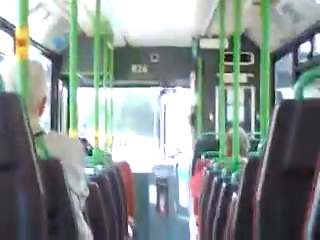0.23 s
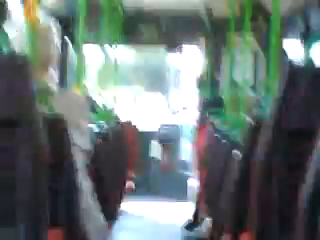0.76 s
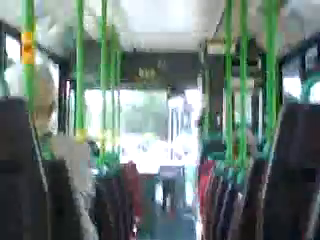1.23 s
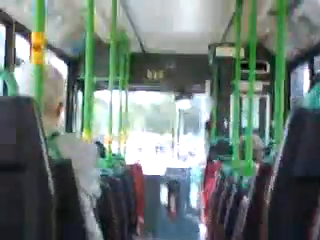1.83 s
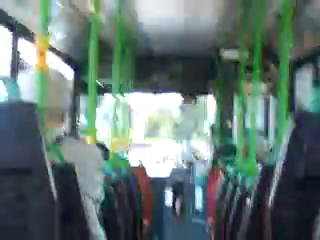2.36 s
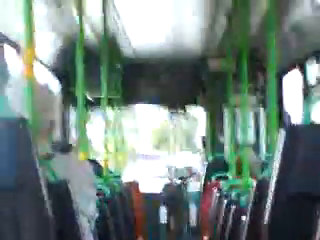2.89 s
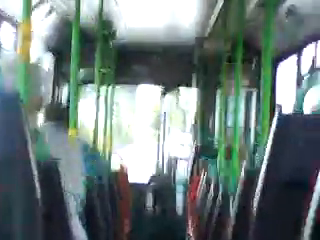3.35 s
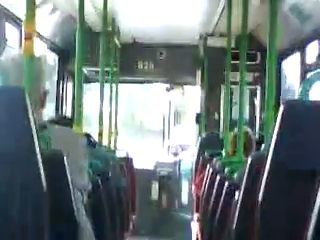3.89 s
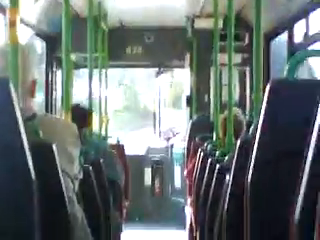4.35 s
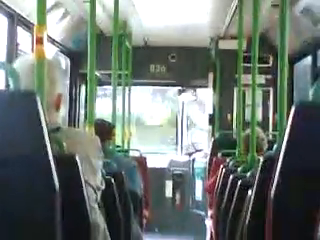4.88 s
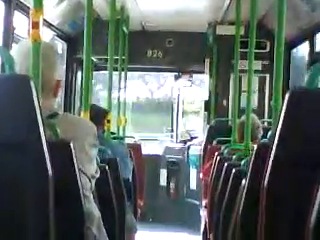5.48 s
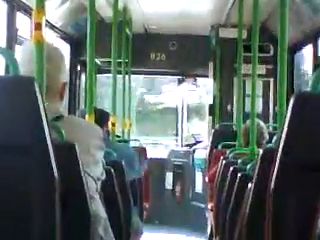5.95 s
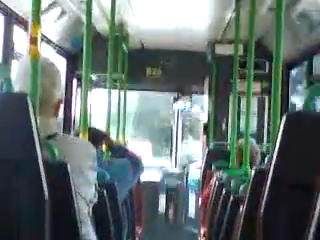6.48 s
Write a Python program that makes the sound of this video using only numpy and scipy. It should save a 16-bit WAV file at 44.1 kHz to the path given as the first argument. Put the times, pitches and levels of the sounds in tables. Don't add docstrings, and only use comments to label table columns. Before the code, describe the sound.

Inside a slowing diesel bus, a low engine drone slides gradually down in pitch over road rumble, floor thuds, trim rattles and tiny squeaks.

```python
import sys
import numpy as np
from scipy import signal
from scipy.io import wavfile
from scipy.ndimage import uniform_filter1d

SR = 44100
rng = np.random.default_rng(int(sys.argv[2]) if len(sys.argv) > 2 else 0)


def store_pcm(level_fs):
    pcm = np.round(np.clip(level_fs, -1, 1) * 32767).astype(np.int16)
    wavfile.write(sys.argv[1], SR, np.atleast_2d(pcm).T)


def rack_gain(trim_db):
    fader = np.asarray(trim_db, float)
    return 10 ** (fader / 20)


N = 296352


def rms_one(x):
    return x / np.sqrt(np.mean(x ** 2) + 1e-20)


def in_time(rows):
    t_s, value = np.transpose(rows)
    return np.interp(np.arange(N) / SR, t_s, value)


def drift(rate_hz):
    r = np.exp(-80 * np.pi * rate_hz / SR)
    slow = signal.lfilter([1], [1, -2 * r, r * r], rng.standard_normal(N // 40 + 2002))[2000:]
    return np.interp(np.arange(N) / 40, np.arange(len(slow)), rms_one(slow))


def resonance(x, hz, width_hz):
    r = np.exp(-np.pi * width_hz / SR)
    poles = [1, -2 * r * np.cos(2 * np.pi * hz / SR), r * r]
    return signal.lfilter([(1 - r * r) / 2, 0, (r * r - 1) / 2], poles, x)


def evened(x, span_s, share):
    power = uniform_filter1d(x ** 2, int(span_s * SR))
    swell = np.sqrt(power + 1e-3 * np.mean(x ** 2))
    return rms_one(x / swell ** share)


def banded_noise(spectrum, patchy_db):
    hz, db = np.transpose(spectrum)
    edges_hz = hz[0] * 2 ** np.arange(0, np.log2(hz[-1] / hz[0]) + .3, 1 / 3)
    white = rng.standard_normal((2, N + SR))
    together = drift(7.8)
    out = 0
    for k, (low, high) in enumerate(zip(edges_hz, edges_hz[1:])):
        sos = signal.butter(2, [low, high], "band", fs=SR, output="sos")
        band = signal.sosfilt(sos, white[k % 2])[SR:]
        level_db = np.interp(np.log(low * high) / 2, np.log(hz), db)
        flicker_db = patchy_db * (0.2 * together + drift(10.0))
        out = out + rack_gain(level_db + flicker_db) * band
    return rms_one(out)


def swells(rest_db, rows):
    t = np.arange(0, N + 64, 64) / SR
    power = rack_gain(2 * rest_db)
    for s, half_s, db in rows:
        power = power + rack_gain(2 * db) * np.exp(-2 * ((t - s) / half_s) ** 2)
    return np.interp(np.arange(N) / SR, t, 10 * np.log10(power))


def lift(hz, peaks):
    return sum(top_db / (1 + ((hz - at_hz) / width_hz) ** 2) for at_hz, width_hz, top_db in peaks)


SWAY_REST_DB, THUD_REST_DB = -23.5, -29
# [middle t/s, half length/s, sway level/dB, thud level/dB]
BUMPS = [(0.188, 0.18, -14.5, -29.5), (0.43, 0.071, -29, -16), (0.557, .1, -14, -26.5),
         (0.844, 0.074, -13.5, -18.5), (1.029, 0.2, -17, -24.5), (1.443, 0.22, -16.5, -23.5),
         (1.722, 0.042, -12.5, -26), (1.908, .07, -17, -25), (2.22, 0.076, -13, -17.5),
         (2.454, 0.15, -17, -31), (2.813, 0.075, -27.5, -24.5), (2.889, 0.035, -11, -24),
         (3.031, 0.052, -13, -20.5), (3.223, 0.045, -18.5, -28), (3.438, 0.11, -16, -22),
         (3.688, 0.068, -19.5, -19), (3.974, 0.14, -19.5, -24), (4.143, 0.097, -17.5, -27.5),
         (4.328, 0.043, -12.5, -25), (4.511, .13, -12.5, -21.5), (5.068, 0.039, -16, -32.5),
         (5.143, 0.087, -32.5, -26.5), (5.424, 0.13, -17.5, -24), (5.62, .08, -30, -22.5),
         (5.829, 0.077, -15, -25), (5.997, 0.15, -16.5, -29), (6.174, 0.13, -23, -29.5),
         (6.46, 0.099, -34.5, -26), (6.702, 0.064, -10.5, -24)]


def bumps():
    sway_db = swells(SWAY_REST_DB, [(s, half_s, db) for s, half_s, db, _ in BUMPS])
    thud_db = swells(THUD_REST_DB, [(s, half_s, db) for s, half_s, _, db in BUMPS])
    return sway_db, thud_db


# [t/s, level/dB]
ROAD_HISS = [(0.0, -38.5), (0.69, -42.5), (0.99, -38.5), (1.23, -44), (1.48, -40), (1.55, -44.5),
             (2.15, -40), (2.49, -44.5), (2.86, -38), (2.9, -43.5), (3.76, -38), (4.19, -42.5), (4.49, -40),
             (4.6, -45.5), (5.35, -42), (6.01, -42), (6.14, -46), (6.72, -39)]
# [f/Hz, level/dB per Hz]
RUMBLE_SPECTRUM = [(70, -23.5), (100, -10), (140, 0.5), (200, -7.5), (290, -11), (360, -16.5), (480, -36.5)]
DRONE_SPECTRUM = [(280, -6.5), (400, 4), (600, 1), (950, -2), (1150, -4.5), (1500, -23)]
HISS_SPECTRUM = [(800, -30.5), (1150, -12.5), (1500, -0.5), (2000, -6), (2500, -6), (3000, -15.5),
                 (4100, -11.5), (5200, -19.5), (6400, -21.5), (8000, -12)]


def road():
    hiss_db = in_time(ROAD_HISS)
    swing_db = hiss_db - hiss_db.mean()
    shake = (bumps()[1] - THUD_REST_DB) / 10 - .5
    rumble_db = -26.5 + 1.28 * swing_db + 2 * shake
    drone_db = -37 + 0.48 * swing_db + 0.5 * shake
    rumble = rack_gain(rumble_db) * evened(banded_noise(RUMBLE_SPECTRUM, patchy_db=0.27), 0.12, .45)
    drone = rack_gain(drone_db) * banded_noise(DRONE_SPECTRUM, patchy_db=0.65)
    hiss = rack_gain(hiss_db - 0.06 + 0.5 * shake) * banded_noise(HISS_SPECTRUM, patchy_db=0.86)
    return rumble + drone + hiss


# [f/Hz, width/Hz, level/dB]
SHELL_MODES = [(13.5, 4, -3.5), (20, 5, 0.0), (26, 8, -5.0)]
# [f/Hz, level/dB per Hz]
THUD_SPECTRUM = [(25, -14), (38, -2), (62, -4), (80, -13.5), (100, -11.5), (130, -36.5)]


def body():
    sway_db, thud_db = bumps()
    push = rng.standard_normal(N + SR)
    sway = 0
    for k, (hz, width_hz, db) in enumerate(SHELL_MODES):
        mode = resonance(resonance(push, hz, width_hz), hz, width_hz)
        sway = sway + rack_gain(db) * rms_one(mode)[SR:] * (-1) ** k
    thud = banded_noise(THUD_SPECTRUM, patchy_db=0.0)
    return rack_gain(sway_db) * evened(sway, 0.11, 0.93) + rack_gain(thud_db) * evened(thud, 0.038, 0.67)


# [t/s, length/s, f/Hz, width/Hz, level/dB rms]
FITTINGS = [(.882, .022, 3500, 2200, -44), (.86, .06, 5800, 3000, -50), (.96, .06, 5800, 3000, -53),
            (1.06, .07, 5200, 3000, -49), (2.24, .08, 2185, 40, -45), (2.3, .13, 2210, 70, -47),
            (2.332, .025, 6000, 2200, -49), (2.3, .25, 5500, 3000, -58), (2.65, .06, 4550, 300, -49),
            (2.66, .09, 5000, 900, -51), (5.95, .14, 2268, 8, -47), (6.58, .2, 4200, 2500, -48)]


def fittings():
    out = np.zeros(N)
    for s, length_s, hz, width_hz, db in FITTINGS:
        start, size = int(s * SR), int(length_s * SR)
        rub = rng.standard_normal(SR // 4)
        rub = resonance(resonance(rub, hz, width_hz), hz, width_hz)[-size:]
        piece = rack_gain(db) * rms_one(rub) * signal.windows.tukey(size, .6)
        out[start:start + size] += piece[:N - start]
    return out


# [t/s, peak level/dB, length/s, brightness/dB per octave]
RATTLES = [(0.202, -33, 0.067, 12), (0.604, -36.5, 0.045, 3), (0.797, -26.5, 0.043, -3),
           (0.836, -27.5, 0.037, -10.5), (0.875, -30.5, 0.026, 2), (0.936, -42, 0.03, 8),
           (1.033, -29.5, 0.043, -3), (1.13, -29.5, 0.04, -11), (1.292, -28.5, 0.034, -5),
           (1.366, -28, 0.038, 3), (1.443, -27, 0.082, -7), (1.468, -27.5, 0.043, 0),
           (1.54, -37, 0.068, 11), (1.916, -37, 0.045, 8.5), (2.016, -32, 0.032, -4), (2.8, -28, 0.041, -1),
           (2.822, -26.5, 0.04, 4.5), (3.056, -35, 0.15, 10.5), (3.359, -31, 0.06, -3.5),
           (3.513, -30.5, 0.055, -7), (3.606, -27, 0.1, 3), (3.62, -31, 0.043, -1), (3.796, -36, 0.026, 6),
           (4.034, -27.5, 0.06, 4), (4.079, -36, 0.022, -8), (4.43, -24.5, 0.042, -2),
           (4.465, -30.5, 0.04, 1.5), (4.524, -35, 0.099, -3), (4.75, -34, 0.087, -11)]
# [f/Hz, level/dB, t60/s]
PANEL_MODES = [(440, -2, .04), (520, -1, .04), (600, 0, .04), (690, -1, .04), (770, 0, .04),
               (830, 1.5, .05), (900, 0, .04), (980, -2, .04), (1300, -11, .03), (2020, -14, .03)]


def rattles():
    t = np.arange(N) / SR
    shake, tilt_db, out = np.zeros(N), np.zeros(N), np.zeros(N)
    for s, db, length_s, bright_db in RATTLES:
        age = (t - s) / max(length_s, .005)
        this = rack_gain(db) * np.clip(1.8 * age + 1, 0, 1) * np.exp(-np.clip(age, 0, 9) ** 2)
        tilt_db[this > shake] = bright_db
        shake = np.maximum(shake, this)
    knocks = (rng.random(N) < 2200 / SR) * shake
    for hz, db, t60_s in PANEL_MODES:
        r, w = rack_gain(-60 / (t60_s * SR)), 2 * np.pi * hz / SR
        level_db = db - 17.5 + tilt_db * np.log2(hz / 750)
        blows = knocks * rack_gain(level_db) * rng.standard_normal(N)
        out += signal.lfilter([0, np.sin(w)], [1, -2 * r * np.cos(w), r * r], blows + 1e-18)
    return out


def tone(turns, multiple, rms_db):
    return np.sqrt(2) * rack_gain(rms_db) * np.sin(2 * np.pi * (multiple * turns + rng.random()))


def strong_tone(turns, multiple, rms_db):
    return tone(turns + .001 * drift(3.0), multiple, rms_db + 1 + .6 * drift(6.0))


WHINE_MULTIPLES = (84.1, 168, 223.9, 335.8)
WHINE_REST_DB = [-50, -58, -62.5, -70.5]
# [middle t/s, half length/s, level/dB rms]
WHINE_SWELLS = [
    [(1.0, 0.13, -59), (2.2, 1, -56), (3.6, 0.91, -43.5), (6.15, 0.75, -59)],
    [(.75, .12, -52), (1.5, 0.11, -53), (2.03, 0.24, -49), (2.54, .25, -45), (3.3, .13, -46),
     (3.8, 0.31, -46), (5.3, 0.35, -53), (6.3, .4, -53.5)],
    [(.2, .3, -50), (2.0, 0.18, -55.5), (2.75, 0.11, -52), (3.6, 0.54, -49), (5.4, 0.21, -52),
     (5.75, .1, -47.5), (6.12, .06, -56)],
    [(1.8, 0.39, -61), (2.75, 0.15, -59), (3.5, 0.15, -76), (4.35, 0.47, -62), (5.25, 0.15, -58.5),
     (5.75, .12, -60.5)],
]


def gear_whines(turns):
    levels_db = [swells(db, rows) for db, rows in zip(WHINE_REST_DB, WHINE_SWELLS)]
    levels_db.append(levels_db[2] - 13)
    out = 0
    for k, db in zip(tuple(WHINE_MULTIPLES) + (279.8,), levels_db):
        flutter_db = 2.0 * drift(12.0) + 1.2 * drift(30.0)
        out = out + tone(turns + .2 / k * drift(12.0), k, db + flutter_db)
    return out


WEAK_MULTIPLES = (10, 11, 14, 19, 22.55, 28, 29)
WEAK_DB = [-52, -46.5, -42.5, -53, -42, -44.5, -50.5]
# [f/Hz, width/Hz, level/dB]
CABIN_MODES = [(138, 23, 6.5), (200, 14, -4), (265, 31, 2)]


def weak_orders(turns, cycle_hz):
    out = 0
    for k, db in zip(WEAK_MULTIPLES, WEAK_DB):
        level_db = db - 2.5 + lift(k * cycle_hz, CABIN_MODES) + 3.4 * drift(1.3)
        out = out + tone(turns, k, level_db)
    return out


EXHAUST_ORDERS = (14.97, 17.02, 17.98, 21.02)
EXHAUST_REST_DB = [-45, -44.5, -50, -45.5]
# [middle t/s, half length/s, level/dB over rest]
THROTTLE = [
    (0.207, .3, 9),
    (1.397, 0.16, 5),
    (2.007, 0.16, 6.5),
    (3.599, .3, 3),
    (5.776, .55, 7.5),
    (6.703, .22, 6.5),
]
# [f/Hz, width/Hz, level/dB]
PIPE_MODES = [(145.3, 6.3, 12), (195.3, 8.6, 9.5)]


def exhaust(turns, cycle_hz):
    fuel_db = swells(0, THROTTLE)
    out = 0
    for k, db in zip(EXHAUST_ORDERS, EXHAUST_REST_DB):
        out = out + strong_tone(turns, k, db + fuel_db + lift(k * cycle_hz, PIPE_MODES))
    return out


BOOM_ORDERS = (12.0, 13.0, 15.81, 24.79, 27.2)
BOOM_REST_DB = [-39, -42.5, -42, -45.5, -52]
# [middle t/s, half length/s, level/dB rms]
BOOM_SWELLS = [
    [(0.0, 0.088, -32), (2.1, 0.091, -21.5), (2.3, 0.45, -31.5), (2.8, 0.57, -31.5), (3.75, 0.9, -28),
     (5.3, 0.66, -27), (6.72, 0.19, -40)],
    [(.3, 0.64, -31.5), (1.5, 0.32, -34), (2.6, 0.25, -30), (3.2, 0.27, -27.5), (3.8, 0.56, -27.5),
     (5.15, 0.77, -28)],
    [(1.4, 0.36, -34.5), (2.75, 0.087, -30), (3.55, 0.9, -36.5), (4.1, 0.16, -31), (5.3, 0.4, -29.5),
     (5.8, 0.27, -28), (6.4, 0.37, -27.5)],
    [(.2, 0.52, -26.5), (.95, 0.57, -35.5), (1.55, 0.42, -33.5), (2.1, 0.26, -32), (3.4, 0.8, -38.5),
     (5.0, .2, -34), (5.45, .35, -29.5), (5.9, 0.23, -31), (6.72, 0.19, -33.5)],
    [(.3, .3, -40.5), (1.5, .35, -38.5), (2.05, .3, -36.5), (3.2, 0.59, -40.5), (4.9, 0.16, -46.5),
     (6.65, .3, -35.5)],
]


def panel_booms(turns):
    out = 0
    for k, rest_db, rows in zip(BOOM_ORDERS, BOOM_REST_DB, BOOM_SWELLS):
        out = out + strong_tone(turns, k, swells(rest_db, rows))
    return out


# [t/s, engine cycle rate f/Hz]
SPEED = [(0.0, 12.293), (0.5, 12.188), (1.5, 11.96), (2.75, 11.674), (3.5, 11.48), (4.25, 11.237),
         (4.75, 11.03), (5.25, 10.757), (5.75, 10.37), (6.0, 10.117), (6.5, 9.534), (6.72, 9.313)]


def engine():
    cycle_hz = in_time(SPEED)
    turns = np.cumsum(cycle_hz) / SR
    orders = panel_booms(turns) + exhaust(turns, cycle_hz) + weak_orders(turns, cycle_hz)
    return orders + gear_whines(turns)


def scene():
    cabin = road() + body() + fittings() + rattles() + engine()
    return (cabin - 0.4 * resonance(cabin, 82, 16))[None]


def drop_faint(x, step_db):
    window = np.sqrt(signal.windows.hann(5632, sym=False))
    frame = dict(window=window, nperseg=5632, noverlap=2816)
    hz, s, lines = signal.stft(x, SR, **frame)
    loud = np.sqrt(np.median(abs(lines[(hz > 3000) & (hz < 6000)]), axis=0) * 1e-4)
    chance_db = 4 * rng.standard_normal((len(hz) // 8 + 1, len(s)))
    step = loud * rack_gain(step_db + chance_db).repeat(8, axis=0)[:len(hz)]
    lines[(abs(lines) < step) & (hz[:, None] > 3000)] = 0
    return signal.istft(lines, SR, **frame)[1][:N]


def clock_mirror(x):
    bass = signal.sosfilt(signal.butter(4, [30, 240], "band", fs=SR, output="sos"), x)
    edge = resonance(bass, 180, 18) + resonance(bass, 220, 18)
    clock = np.cos(2 * np.pi * 8000 * np.arange(N) / SR)
    return rack_gain(-59) * (1.2 * bass + 3 * edge) * clock


def low_pass(x):
    return signal.sosfilt(signal.butter(12, 8260, fs=SR, output="sos"), x)


def record(dry):
    x = signal.sosfilt(signal.butter(2, 9, "high", fs=SR, output="sos"), dry[0])
    x = drop_faint(.6 * np.tanh(x / .6), step_db=-3)
    x = signal.sosfilt(signal.cheby2(10, 50, 7600, fs=SR, output="sos"), x)
    mix = (x + clock_mirror(x))[None]
    return low_pass(mix)


dry = scene()
out = record(dry)
store_pcm(out)
```